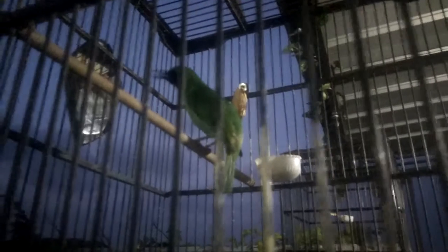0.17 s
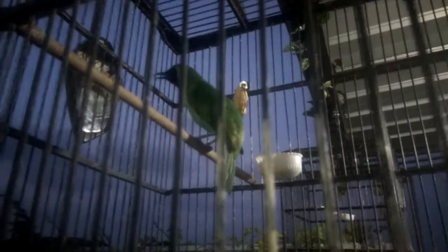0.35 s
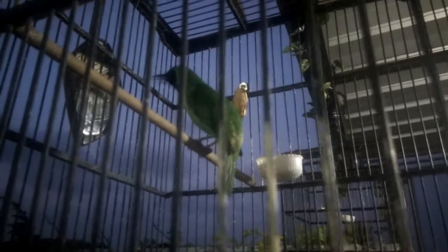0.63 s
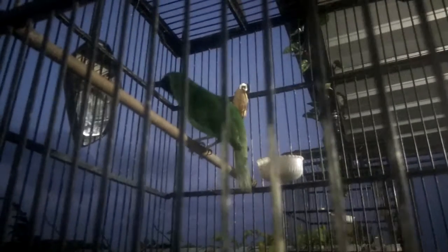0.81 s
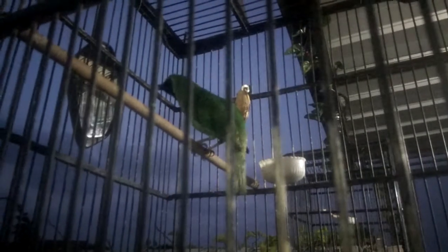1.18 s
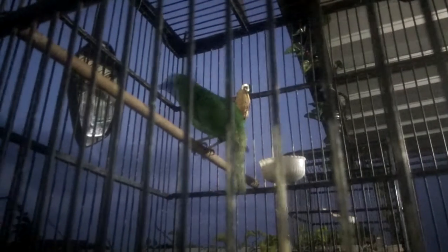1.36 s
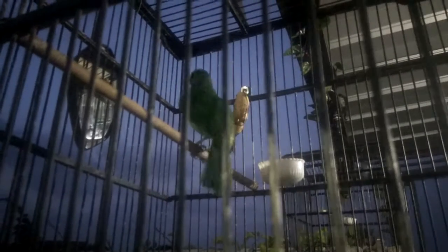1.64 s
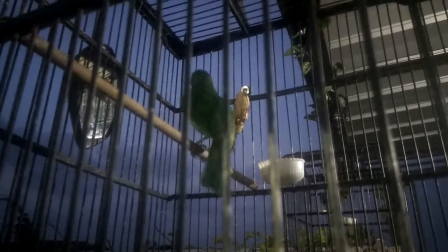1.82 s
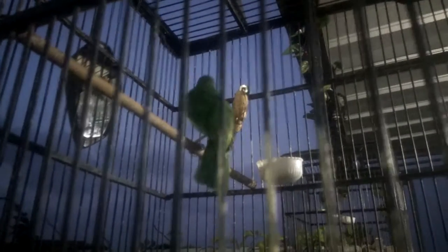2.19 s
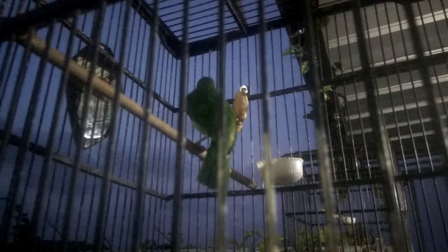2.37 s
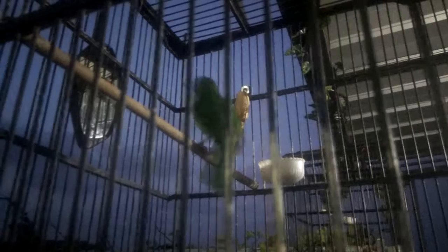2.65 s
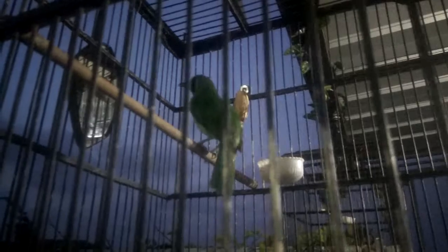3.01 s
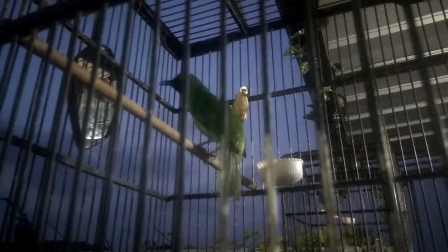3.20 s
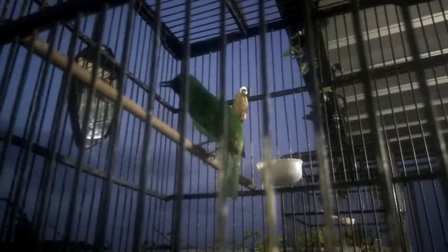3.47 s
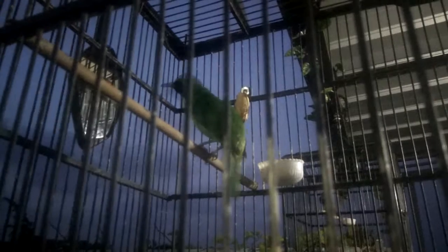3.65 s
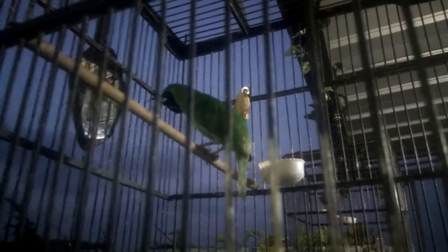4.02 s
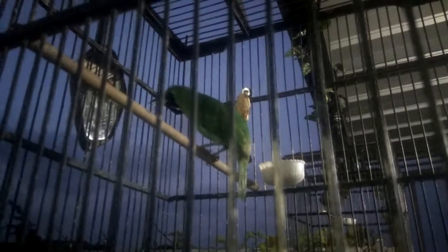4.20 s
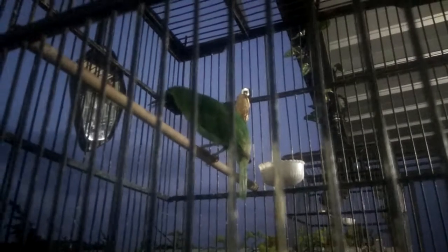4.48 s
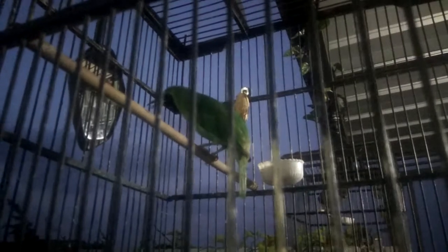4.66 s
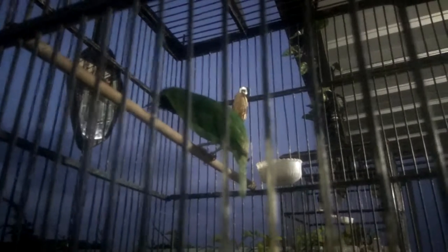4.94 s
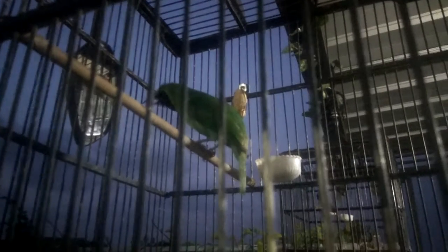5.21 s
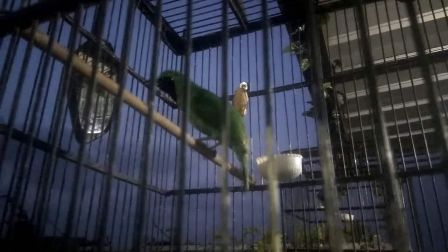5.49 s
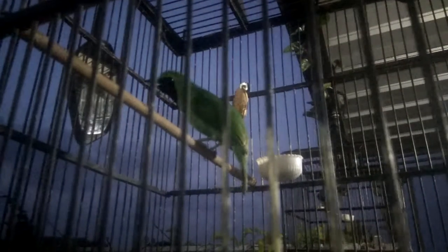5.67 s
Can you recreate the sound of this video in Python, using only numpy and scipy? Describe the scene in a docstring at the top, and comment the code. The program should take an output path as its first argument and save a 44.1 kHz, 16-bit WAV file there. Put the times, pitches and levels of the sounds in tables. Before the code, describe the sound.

A small songbird chirps, whistles and trills brightly in a cage, with short porch echo over a faint distant town rumble.

```python
"""A small songbird sings in a cage under a porch roof: see-saw chirps, slurred whistles, two buzzy trills,
a squawk, thin notes, a tick, falling chips, a quick twitter and a closing whistle. Its voice is a nearly pure
tone with weak overtones and some air noise; roof and walls echo it briefly. The cage bumps softly as damped
tones. Behind it are a distant town rumble made of noise, a low hum, a faint high whine, far peeps and ticks."""
import sys
import numpy as np
from scipy import signal
from scipy.fft import rfft, irfft, next_fast_len
from scipy.io import wavfile
from scipy.ndimage import uniform_filter1d

SR = 44100
rng = np.random.default_rng(int(sys.argv[2]) if len(sys.argv) > 2 else 0)


def unload_audio(sound):
    """Save the sound as a 16-bit wav file, at the path given as the first command line argument."""
    columns = np.transpose(np.atleast_2d(sound))
    # keep every value between -1 and 1, then stretch to whole-number steps
    steps = np.round(np.clip(columns, -1, 1) * 32767)
    wavfile.write(sys.argv[1], SR, steps.astype(np.int16))


N = 257544
T = np.arange(N) / SR  # time of every sample, in seconds

# relative colour of the town rumble on each side: pitch_hz, level_db
TOWN_LEFT = [(15, -60.5), (28, -23.5), (45, 4.5), (70, 7), (150, -5.5), (250, -9.5), (450, -23),
             (680, -24.5), (860, -17.5), (1200, -24.5), (2000, -24), (3500, -32.5), (6000, -38.5),
             (12500, -43), (16000, -48.5)]
TOWN_RIGHT = [(15, -51), (45, -6.5), (70, -2.5), (150, 0), (250, -5.5), (450, -15.5), (680, -18),
              (860, -13), (1200, -25.5), (2000, -21.5), (3500, -29.5), (6500, -30), (9200, -36),
              (12000, -33), (16000, -36)]
TOWN_DB = -49  # rumble level before its slow sway
# how alike the rumble is on both sides: pitch_hz, coherence (0 to 1)
LIKENESS = [(30, 0.45), (70, 0.23), (140, 0.78), (900, 0.6), (2500, 0.045), (6000, 0.034), (15000, 0.3)]
# steady hum: pitch_hz, level_db
HUM = [(100, -59), (146, -56), (199.5, -63), (300, -69)]
# far-off noise that flutters in the midrange: pitch_hz, width_hz, level_db, flutter_db
FAR_BANDS = [(603, 450, -71.5, 2.5), (888, 240, -68, 3.5), (1090, 750, -72.5, 5), (1552, 220, -70, 5.5)]
# the clearest far-off peeps: start_s (their middle), pitch_hz, level_db
PEEPS = [(.175, 839, -52.5), (.4, 870, -53.5), (1.745, 907, -50), (1.85, 829, -52.5), (2.67, 840, -53),
         (2.89, 846, -50.5), (3.915, 860, -50), (4.25, 847, -48.5), (4.285, 920, -52.5), (5.005, 922, -52),
         (5.46, 860, -51)]
# soft bumps of perch and cage: start_s, pitch_hz, level_db, t60_s (time to fall 60 dB), left_minus_right_db
BUMPS = [(.872, 565, -39.5, 0.072, -8), (1.045, 1490, -44, 0.048, -9), (3.606, 1560, -39.5, 0.039, -5),
         (5.26, 60.5, -38, 0.19, 26), (5.275, 125.7, -43, 0.12, 5)]

# nearby surfaces: delay_s, left_db, right_db
REFLECTIONS = [(.0031, -9.5, -25), (.0062, -15, 2), (.0088, -19, -13), (.0113, -9, 1.5),
               (.0146, -15.5, -16.5), (.0187, -3.5, -7), (.0305, -26, -2)]
# colour of the porch echo: pitch_hz, level_db
PORCH = [(200, 3.5), (2100, 0.5), (2700, -1), (3400, 3.5), (5000, -2.5), (9000, -15), (16000, -17)]
PORCH_T60_S, PORCH_DB = 0.33, 5.5
SLAP_S, SLAP_DB = .0215, -9  # delay and level of one extra clear echo
# when that echo is heard: start_s, end_s
SLAP_SPANS_S = [(3.53, 3.58), (5.15, 5.312)]
# echo of an earlier chirp, still dying away: pitch_hz, width_hz, level_db at the start
LINGERING = [(2744, 120, -55), (3390, 200, -61.5)]
# left minus right loudness of the bird: pitch_hz, level_db
SHADE = [(1800, -6.5), (2300, 4), (2700, -4), (3300, -8), (4400, 1), (7000, -3), (15000, 1.5)]
# how far the bird's left side trails the right: pitch_hz, lag_radians
PORT_LAG = [(1000, -5), (1800, 2.5), (2150, 0.36), (2400, 1.46), (2560, 2.5), (2950, 3), (3250, 2.5),
            (3550, -0.5), (3900, 4.5), (4500, 3.5), (4900, 5), (6500, 8.5), (15000, 11.5)]

# second to seventh partial, relative to each other: level_db
OVERTONES_DB = [3, -1, -13.5, -20.5, -14.5, -4]
# relative colour of the hoarse air noise: pitch_hz, level_db
HOARSE = [(800, -40.5), (1800, -14), (3000, -4.5), (4600, -14.5), (6500, -3.5), (9000, -4), (12000, -24.5),
          (16000, -29.5)]
BRIGHTENING = 0.29  # dB of overtone gained for each dB of level within a note

# Each kind of syllable has one shape, stretched to every row's length and pitch range, and one voice.
# shapes: length_share, rise (pitch from low 0 to high 1), level_db
SCOOP = [(0, 0.95, -26), (.22, .15, -7), (.44, 0, -4.5), (0.699, .14, -0.5), (0.878, .28, -2),
         (1, .48, -25)]
VEE = [(0, 1, -28), (.38, .42, -20.5), (.52, .1, -1), (.72, 0.019, -1), (.88, .2, -7.5), (0.999, .45, -10)]
RISE = [(0, 0, -21), (0.249, .2, -10), (0.498, 0.38, -3), (.68, .7, -2.5), (.82, .92, -18),
        (1, 0.93, -18.5)]
SWELL = [(0, 0.07, -12), (.3, .6, -8.5), (.62, .93, -2), (.8, 1, -5), (1, 0.96, -6)]
FALL = [(0, 1, -11), (.16, .55, -8.5), (.38, .2, 1.5), (.62, .08, -15), (1, 0, -6)]
DIP = [(0, 0.84, -12), (0.119, .45, -7), (.4, 0, 3.5), (.6, 0.17, 5), (.85, .38, -9.5), (1, 0.36, -10)]
FLICK = [(0, 0.18, -6), (.25, .35, 0), (.55, .7, -2.5), (.8, .9, -2.5), (1, 0.96, -14)]
# voices: overtone_db and hoarse_db (both before high notes strain them), echo_db (the turned head
# sends more or less to the walls)
LOW_VOICE = (-44, -37, -19.5)
HIGH_VOICE = (-49, -36, -16.5)
UPSLUR_VOICE = (-38.5, -26, -17.5)
WHISTLE_VOICE = (-44, -64, -21.5)
THIN_VOICE = (-36, -42.5, -13)
DIP_VOICE = (-40.5, -29, -13.5)
PIP_VOICE = (-44, -43, -16.5)
FLICK_VOICE = (-34.5, -26.5, -17)
# one voice a chip, same columns
CHIP_VOICES = [(-26.5, -24, -11.5), (-27.5, -26, -13), (-40, -26, -12.5)]
# one voice a trill, same columns; the second is hoarser and echoes more
TRILL_VOICES = [(-45, -41.5, -19), (-37, -25.5, -18)]

# syllables: start_s, length_s, low_hz, high_hz, level_db (added to the shape's level)
LOW_CHIRPS = [(.031, 0.092, 1955, 2524, -28), (.343, 0.061, 2080, 2475, -28.5),
              (.606, .07, 1982, 2427, -29), (.881, 0.065, 1992, 2397, -29)]
# high chirps that answer the low ones, same columns
HIGH_CHIRPS = [(.214, .048, 2607, 3400, -29), (.468, .046, 2670, 3120, -28.5), (.73, .046, 2660, 3050, -28)]
# upward slurs, same columns
UPSLURS = [(1.165, .07, 1830, 2291, -28.5), (1.47, .043, 1796, 2540, -24)]
# falling chips, same columns
CHIPS = [(4.678, 0.024, 2402, 3650, -28.5), (4.814, 0.023, 2447, 3700, -31), (4.973, .04, 2728, 4800, -31)]
# dipping chirps, a lone one and then a quick twitter of three, same columns
DIPS = [(1.025, .075, 2672, 3360, -40.5), (5.187, .022, 2725, 3717, -34.5), (5.235, .025, 2724, 3433, -33),
        (5.291, .027, 2760, 3404, -33)]
# short soft pips, same columns
PIPS = [(5.37, .021, 2480, 2620, -35), (5.402, .013, 2480, 2593, -38), (5.422, .02, 2482, 2600, -32)]
# upward flicks from the other side of the syrinx, over high chirps and twitter notes, same columns
FLICKS = [(0.259, 0.023, 2900, 3410, -41.5), (0.503, 0.033, 2894, 3376, -41.5),
          (0.768, 0.0319, 2924, 3496, -37), (5.198, .012, 2960, 3170, -49),
          (5.258, 0.0163, 2960, 3300, -45.5), (5.315, 0.0149, 2970, 3260, -59)]

# slurred whistles: start_s, length_s, crest_hz, final_hz, climb_s, fall_s, level_db, swell_db,
# peak_share (share of the length where it is loudest)
WHISTLES = [(2.001, 0.14, 2443, 2113, .02, 0.038, -22, 12.5, 0.84),
            (2.257, 0.135, 2417, 2127, .022, 0.04, -24.5, 12.5, 0.62),
            (2.524, .127, 2402, 2109, .019, 0.035, -22, 20, 0.48),
            (2.807, 0.15, 2386, 2177, .022, 0.03, -22, 17, 0.53)]
WHISTLE_SCOOP_HZ = 242.8  # the pitch climbs this far to its crest, then sinks
WHISTLE_ATTACK_S, WHISTLE_RELEASE_S, WHISTLE_EDGE_DB = 0.0086, 0.014, -15.5  # fades at both ends
# a softer whistle that holds its crest and breaks downward: time_s, pitch_hz, level_db
BROKEN_WHISTLE = [(1.752, 2150, -43), (1.768, 2330, -34.5), (1.785, 2388, -31.5), (1.815, 2290, -30),
                  (1.831, 2250, -38), (1.848, 2070, -29.5), (1.868, 2036, -30), (1.886, 2136, -40)]
# the closing whistle: time_s, pitch_hz, level_db
RISING_WHISTLE = [(5.69, 1990, -53), (5.71, 2407, -44.5), (5.722, 2483, -40), (5.764, 2610, -46.5),
                  (5.815, 2642, -39.5), (5.845, 2490, -33)]
# thin notes that dip before they level out, one list each: time_s, pitch_hz, level_db
THIN_NOTES = [
    [(4.083, 3370, -55), (4.1, 3332, -46.5), (4.131, 3262, -38.5), (4.146, 3285, -45.5),
     (4.169, 3375, -27.5), (4.187, 3392, -59), (4.215, 3350, -63)],
    [(4.445, 3080, -58), (4.456, 3030, -56), (4.477, 3235, -42.5), (4.494, 3205, -37.5),
     (4.511, 3255, -34.5), (4.545, 3245, -43), (4.57, 3258, -51)],
]
# trills, one list each: time_s, pitch_hz, level_db (before the throb), wobble_hz (depth about the pitch)
TRILLS = [
    [(3.112, 2184, -43.5, 0), (3.128, 2141, -30, 20), (3.145, 2056, -30, 147), (3.165, 2107, -30.5, 153.5),
     (3.215, 1961, -30, 118.5), (3.238, 2003, -45, 97)],
    [(3.41, 2100, -52, 80.2), (3.428, 1980, -42, 70), (3.437, 2060, -36, 170), (3.485, 2090, -32.5, 177.5),
     (3.505, 2260, -33, 301.4), (3.53, 2620, -32.5, 599), (3.553, 2620, -35, 656.7),
     (3.568, 2365, -37, 327.2), (3.581, 2245, -29.5, 198), (3.594, 2204, -58, 99)],
]
TRILL_HZ, TRILL_CREST_S = 59.3, 3.129  # wobbles per second, and the time of one crest
THROAT_HZ, THROAT_WIDTH_HZ = 2148, 460  # throat resonance
# a harsh squawk: time_s, pitch_hz, level_db
SQUAWK = [(3.960, 3400, -49), (3.9625, 2293, -39), (3.965, 2010, -38.5), (3.9695, 2302, -30),
          (3.972, 2033, -39), (3.976, 1970, -45), (3.986, 2160, -60)]
# its first partials: level_db
SQUAWK_PARTIALS_DB = [-2.5, 1.5, -12]
SQUAWK_ECHO_DB = -15.5
# a very high tick made of three snaps: time_s (middle), half_length_s, pitch_hz, level_db
TICKS = [(4.3232, 0.0013, 5750, -38.5), (4.325, 0.00093, 4940, -31), (4.329, .0018, 4770, -35.5)]
# its first partials: level_db
TICK_PARTIALS_DB = [3, -14, -13]
TICK_ECHO_DB = -14.5
TOP_HZ = 15700  # nearly everything above this is removed at the end


def undb(db):
    """Turn decibels into a gain."""
    return 10 ** (np.asarray(db) / 20)


def level(x, db):
    """Scale a sound to an rms (average) level."""
    return x * undb(db) / np.sqrt(np.mean(x ** 2))


def curves(rows):
    """Join each column of a table by straight lines in time."""
    times, *columns = np.transpose(rows)
    return [np.interp(T, np.sort(times), column) for column in columns]


def on_bins(points, size):
    """Spread a (Hz, value) table over the bins of a spectrum, evenly in log pitch."""
    hz, value = np.transpose(points)
    bin_hz = np.fft.rfftfreq(size, 1 / SR)
    return np.interp(np.log(bin_hz + 1), np.log(hz), value)


def colour(x, points, share=1):
    """Filter by a (Hz, dB) table, or by a share of its decibels."""
    size = x.shape[-1]
    return irfft(rfft(x) * undb(share * on_bins(points, size)), size)


def band(hz, width_hz):
    """Noise gathered around one pitch, as in a resonance, rms 1."""
    offset = 2 * (np.fft.rfftfreq(N, 1 / SR) - hz) / width_hz
    spectrum = rfft(rng.standard_normal(N)) / (1 + offset ** 2)
    return level(irfft(spectrum, N), 0)


def walk(rate):
    """Smooth random wandering, with a spread near 1 and about `rate` new values a second."""
    k = max(int(SR / rate), 2)
    held = np.repeat(rng.standard_normal(N // k + 1), k)
    smooth = uniform_filter1d(uniform_filter1d(held, k), k)
    return 1.35 * smooth[:N]


def turn(hz):
    """Add up a pitch curve into the running phase of a wave."""
    return 2 * np.pi * np.cumsum(hz) / SR


def pan(x, db):
    """Place a sound by its left minus right level."""
    return x * undb(np.array([[db], [-db]]) / 2)


def town(sway_db=1):
    """Distant rumble of partly shared noise, a wavering hum and fluttering bands of far-off noise."""
    common, *own = rfft(rng.standard_normal((3, N)))
    alike = np.clip(on_bins(LIKENESS, N), 0, 1)
    left, right = irfft(np.sqrt(alike) * common + np.sqrt(1 - alike) * np.array(own), N)
    rumble = np.array([colour(left, TOWN_LEFT), colour(right, TOWN_RIGHT)])
    rumble = level(rumble, TOWN_DB) * undb(sway_db * walk(4.944))
    hum = 0
    for hz, db in HUM:
        tone = np.sin(turn(hz * (1 + 0.01577 * walk(10))))
        hum = hum + level(tone * undb(2 * walk(16)), db)
    far = 0
    for hz, width, db, flutter_db in FAR_BANDS:
        far = far + level(band(hz, width) * undb(flutter_db * walk(30)), db)
    return rumble + pan(hum, -2.3) + pan(far, -13)


def whine(pulsing_db=-77, warble_db=-74, low_db=-85, centre_hz=11720, swing_hz=190, stray_hz=170, count=2):
    """Faint high whine, mostly on the right: a pulsing tone, crossing warbles and a narrow band of noise."""
    cycle = 2 * np.pi * 12.5 * (T - .062)  # 12.5 swings a second
    pulses = 1 + np.cos(cycle + .4 * walk(6))
    line = np.sin(2 * np.pi * 14000 * T) * pulses * undb(1.5 * walk(12))
    warble = 0
    for k in range(count):
        loudness = undb(6.7 * walk(44))
        hz = centre_hz + swing_hz * np.sin(cycle + k) + stray_hz * walk(55) + 170 * walk(900)
        warble = warble + loudness * np.sin(turn(hz))
    low = level(band(6980, 120), low_db)
    return pan(level(line, pulsing_db) + level(warble, warble_db) + low, -9.5)


def faint_ticks(length_s=.005, hz=8300, width_hz=1100, db=-72, spread_db=3, count=60):
    """Tiny high ticks in the distance: short bursts of noise at random times."""
    times = rng.random(count) * N / SR
    nearest = np.min([np.abs(T - s) for s in times], axis=0)  # seconds to the closest tick
    bursts = np.exp(-np.minimum((nearest / length_s) ** 2, 20))
    return pan(undb(db + spread_db * walk(24)) * bursts * band(hz, width_hz), -2.5)


def peeps(faint_db=-64, spread_db=12, length_s=0.012, glide=0.04955, count=110):
    """Short far-off peeps near 860 Hz, each bending its own way, with many fainter ones between."""
    faint = [(a * N / SR, 640 + 240 * (b + c), faint_db + spread_db * (d - .5))
             for a, b, c, d in rng.random((count, 4))]
    out = np.zeros(N + SR)
    age = np.arange(-SR // 16, SR // 16) / SR  # seconds from the middle of a peep
    bump = np.sqrt(2) * np.exp(-(age / length_s) ** 2)
    for s, hz, db in PEEPS + faint:
        bend = 1 + glide * rng.standard_normal() * np.tanh(age / length_s)
        start = max(int((s + age[0]) * SR), 0)
        out[start:start + len(age)] += undb(db) * bump * np.sin(turn(hz * bend))
    return pan(out[:N], -13.5) + porch(out[:N] * undb(-12.5))


def cage():
    """Each bump of perch or cage rings one tone that dies away."""
    out = np.zeros((2, N))
    for s, hz, db, t60, pan_db in BUMPS:
        age = np.maximum(T - s, 0)
        decay = undb(db - 60 * np.minimum(age / t60, 3))
        onset = 1 - np.exp(-age / 0.0014)
        out += pan(decay * onset * np.sin(2 * np.pi * hz * age), pan_db)
    return out


def porch(x):
    """A few close reflections, then a short diffuse tail that builds up behind them."""
    t = T[:SR // 2]
    build_up = np.clip(t / 0.0079, 0, 1)
    tail = rng.standard_normal((2, len(t))) * undb(-60 * t / PORCH_T60_S) * build_up
    response = undb(PORCH_DB) * colour(tail / np.sqrt(np.sum(tail ** 2) / 2), PORCH)
    for delay, left_db, right_db in REFLECTIONS:
        response[:, int(delay * SR)] += undb([left_db, right_db])
    return signal.fftconvolve(x[None], response, axes=1)[:, :N]


def forced(size, hz, partials_db, jitter, air_db, echo_db):
    """A forced, rough tone with strong partials and rushing air: direct sound and the part sent to the walls."""
    phase = turn(hz * (1 + jitter * walk(1500)))
    tone = np.sqrt(2) * sum(undb(db) * np.sin((k + 1) * phase) for k, db in enumerate(partials_db))
    air = level(colour(rng.standard_normal(N), HOARSE), air_db)
    sound = size * (tone + air)
    return np.array([sound, sound * undb(echo_db)])


def tick():
    """The air valve snaps open three times in quick succession."""
    size = sum(undb(db) * np.exp(-np.minimum(((T - s) / half) ** 2, 20)) for s, half, hz, db in TICKS)
    hz = curves(TICKS)[1]
    return forced(size, hz, TICK_PARTIALS_DB, jitter=.09, air_db=-8, echo_db=TICK_ECHO_DB)


def squawk(rasp_db=3):
    """A rasping cry whose second partial is the strongest."""
    size, hz = syllable(SQUAWK)
    rasp = undb(rasp_db * walk(900))
    return forced(size * rasp, hz, SQUAWK_PARTIALS_DB, jitter=.1, air_db=-3, echo_db=SQUAWK_ECHO_DB)


def syllable(rows, corners=0.081):
    """Loudness, pitch and extras of one note; muscles round its corners, the air valve moves within a few ms."""
    times = np.transpose(rows)[0]
    ease = max(int(corners * np.ptp(times) * SR), 1)
    hz, db, *rest = (uniform_filter1d(c, ease) for c in curves(rows))
    to_edge = np.minimum(T - times.min(), times.max() - T)  # seconds inside the note
    valve = np.clip(to_edge / .004 + .5, 0, 1)
    smooth_valve = valve * valve * (3 - 2 * valve)
    return smooth_valve * undb(db), hz, *rest


def gesture(shape, s, length, low_hz, high_hz, db):
    """Loudness and pitch of a shape stretched to one syllable."""
    return syllable([(s + share * length, low_hz + rise * (high_hz - low_hz), db + shape_db)
                     for share, rise, shape_db in shape])


def whistle(s, length, crest_hz, final_hz, climb_s, fall_s, db, swell_db, peak_share):
    """The pitch scoops up to a crest and sinks to a held note while the sound swells."""
    age = np.linspace(0, length, 40)
    late = age - climb_s  # seconds after the crest
    climb = crest_hz - WHISTLE_SCOOP_HZ * (late / climb_s) ** 2
    sink = final_hz + (crest_hz - final_hz) * np.exp(-(late / fall_s) ** 2)
    hz = np.where(late < 0, climb, sink)
    swell = swell_db * np.minimum(age / (peak_share * length) - 1, 0)
    inside = np.minimum(age / WHISTLE_ATTACK_S, (length - age) / WHISTLE_RELEASE_S)
    edges = np.maximum(1 - inside, 0) ** 2
    return syllable(np.transpose([s + age, hz, db + swell + WHISTLE_EDGE_DB * edges]))


def trill(rows, throb=0.65, unevenness=0.25, ragged=.28):
    """Loudness and pitch of a fast wobble, which throbs as it swings through the throat resonance."""
    wobble = np.cos(2 * np.pi * TRILL_HZ * (T - TRILL_CREST_S) + unevenness * walk(60))
    # the airflow is pinched at the bottom of every swing
    pinch = 1 - np.clip(throb, 0, 1) * ((1 - wobble) / 2) ** 4
    size, hz, depth = syllable(rows)
    hz = hz + depth * (wobble + ragged * walk(350))  # wide swings turn ragged
    detune = 2 * (hz - THROAT_HZ) / THROAT_WIDTH_HZ
    steepness = np.where(detune < 0, -1.2, -.5)  # the low side is steep
    return size * pinch * (1 + detune ** 2) ** steepness, hz


def song():
    """List every note of the main side of the syrinx (the bird's voice organ), with its voice."""
    kinds = [(LOW_CHIRPS, SCOOP, LOW_VOICE), (HIGH_CHIRPS, VEE, HIGH_VOICE), (UPSLURS, RISE, UPSLUR_VOICE),
             (PIPS, SWELL, PIP_VOICE), (DIPS, DIP, DIP_VOICE)]
    notes = [(gesture(shape, *row), voice) for rows, shape, voice in kinds for row in rows]
    notes += [(gesture(FALL, *row), voice) for row, voice in zip(CHIPS, CHIP_VOICES)]
    notes += [(syllable(BROKEN_WHISTLE), WHISTLE_VOICE)]
    notes += [(whistle(*row), WHISTLE_VOICE) for row in WHISTLES]
    notes += [(trill(rows), voice) for rows, voice in zip(TRILLS, TRILL_VOICES)]
    notes += [(syllable(rows), THIN_VOICE) for rows in THIN_NOTES + [RISING_WHISTLE]]
    return notes


def syrinx(pitch, strength, overtone_db, hoarse_db, patchy_db=3, jitter=.06, shimmer_db=2.2, shrill_db=12,
           strain_db=6):
    """A nearly pure tone with weak overtones; hoarseness shakes its pitch and adds air noise."""
    # high notes need a tighter syrinx, which makes them brighter and rougher
    tension = np.clip((pitch - 2400) / 700, 0, 1)
    hoarse = undb(hoarse_db + strain_db * (tension - 1.5))
    phase = turn(pitch * (1 + jitter * np.sqrt(hoarse) * walk(700)))
    overtones = 0
    for number, db in enumerate(OVERTONES_DB, start=2):
        fits = number * pitch < SR / 2  # leave out what is too high to represent
        overtones = overtones + undb(db) * np.sin(number * phase) * fits
    brightness = undb(overtone_db + shrill_db * tension + patchy_db * walk(50))
    tone = np.sqrt(2) * (np.sin(phase) + brightness * overtones)
    air = hoarse * level(colour(rng.standard_normal(N), HOARSE), 0)
    # clear notes hold their level better, hoarse ones flutter
    unsteady = np.clip((hoarse_db + 70) / 30, .3, 1)
    return strength * undb(shimmer_db * unsteady * walk(120)) * (tone + air)


def sing(notes):
    """One side of the syrinx sings the loudest note of each moment: direct sound and the part sent to the walls."""
    pitch, strength, effort, voices = np.zeros(N), np.zeros(N), np.ones(N), np.zeros((N, 3))
    for (size, hz), voice in notes:
        on = size > strength
        pitch[on], strength[on] = hz[on], size[on]
        effort[on], voices[on] = size[on] / size.max(), voice
    overtone_db, hoarse_db, echo_db = voices.T
    brighter_db = BRIGHTENING * 20 * np.log10(effort)  # each note is brightest where loudest
    sound = syrinx(pitch, strength, overtone_db + brighter_db, hoarse_db)
    return np.array([sound, sound * undb(echo_db)])


def bird():
    """Song and echoes get frequency-dependent lag and shading between the sides; two more echoes are added."""
    flicks = [(gesture(FLICK, *row), FLICK_VOICE) for row in FLICKS]
    voice, to_walls = sing(song()) + sing(flicks) + squawk() + tick()
    spans = sum(1. * (T > start) * (T < end) for start, end in SLAP_SPANS_S)
    slap_gate = uniform_filter1d(spans, size=400)
    slap = undb(SLAP_DB) * np.roll(voice * slap_gate, int(SLAP_S * SR))
    decay = undb(-60 * np.minimum(T / PORCH_T60_S, 2))
    lingering = sum(undb(db) * band(hz, width) for hz, width, db in LINGERING) * decay
    size = next_fast_len(N + SR // 10)  # spare room so the lag does not wrap around
    left, right = np.pad(voice + porch(to_walls), ((0, 0), (0, size - N)))
    left = irfft(rfft(left) * np.exp(-1j * on_bins(PORT_LAG, size)), size)
    sides = np.array([colour(left, SHADE, .5), colour(right, SHADE, -.5)])[:, :N]
    return sides + slap + lingering


def scene():
    """Surroundings, cage and bird together."""
    return town() + whine() + faint_ticks() + peeps() + cage() + bird()


def record(dry):
    """A very steep low-pass filter cuts the top."""
    return signal.sosfilt(signal.ellip(10, .1, 80, TOP_HZ, fs=SR, output="sos"), dry)


dry = scene()
out = record(dry)
unload_audio(out)
```